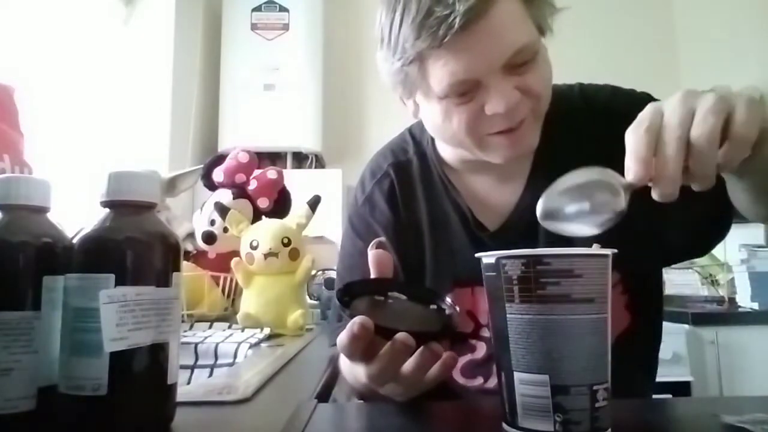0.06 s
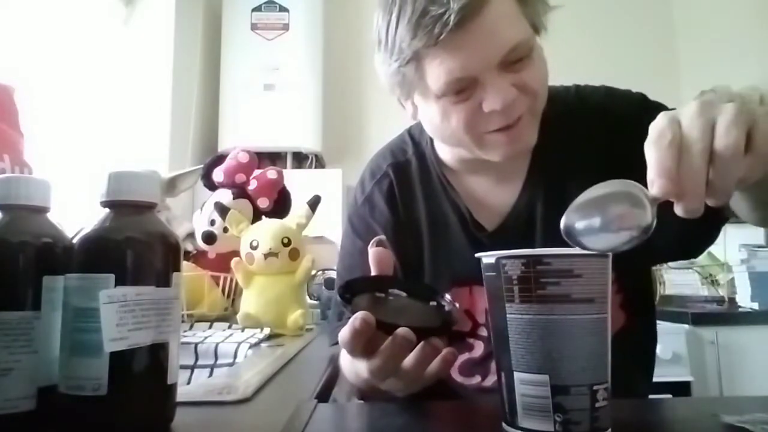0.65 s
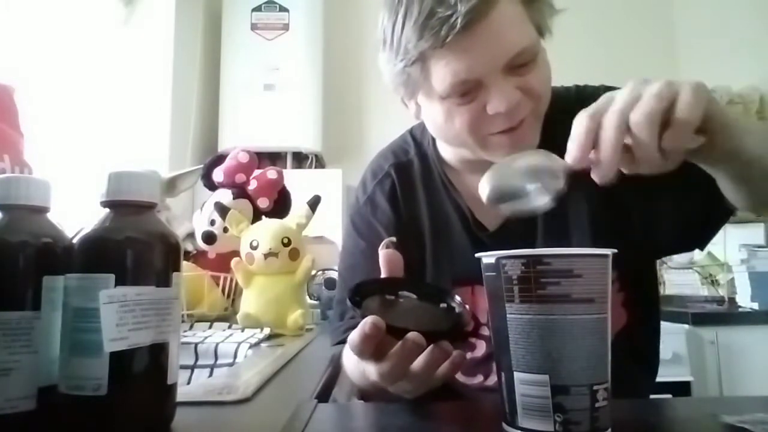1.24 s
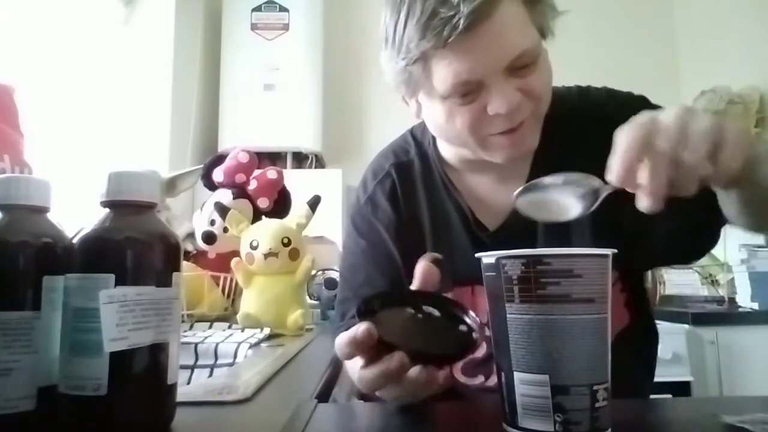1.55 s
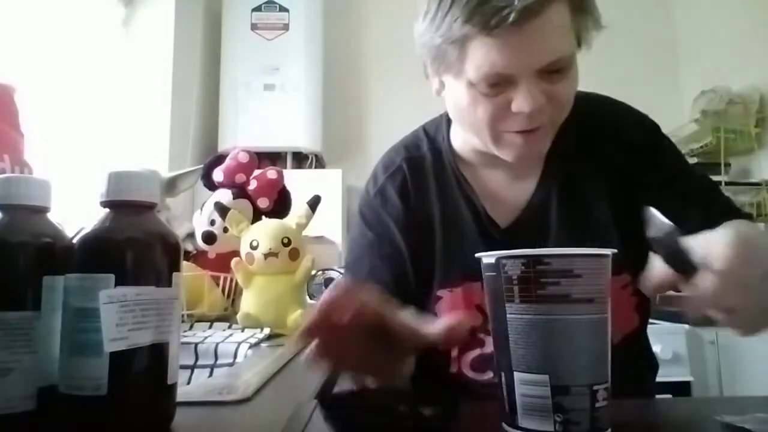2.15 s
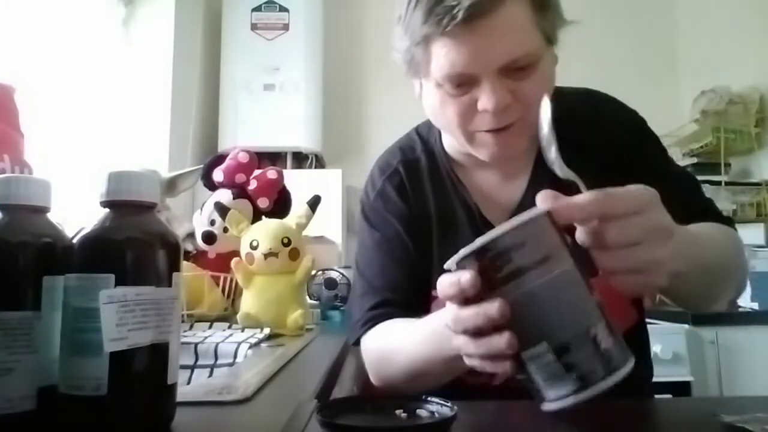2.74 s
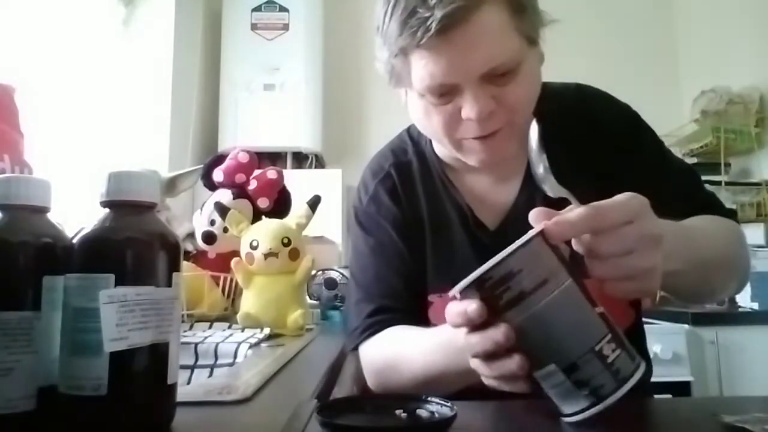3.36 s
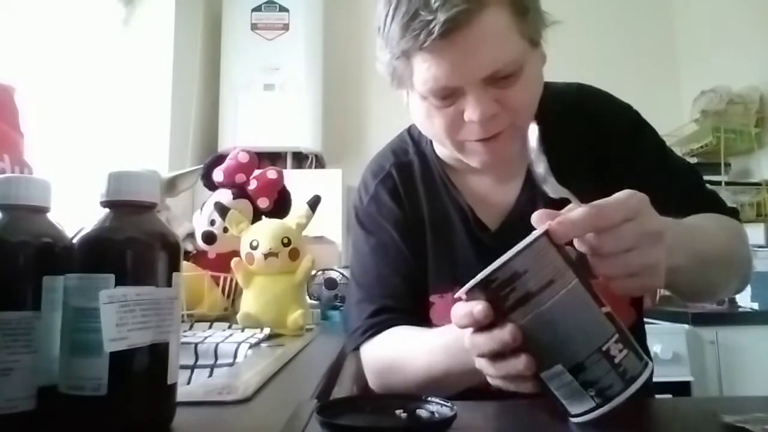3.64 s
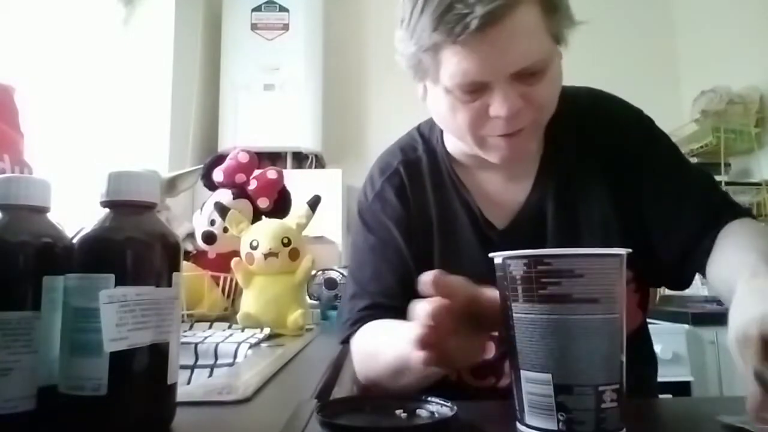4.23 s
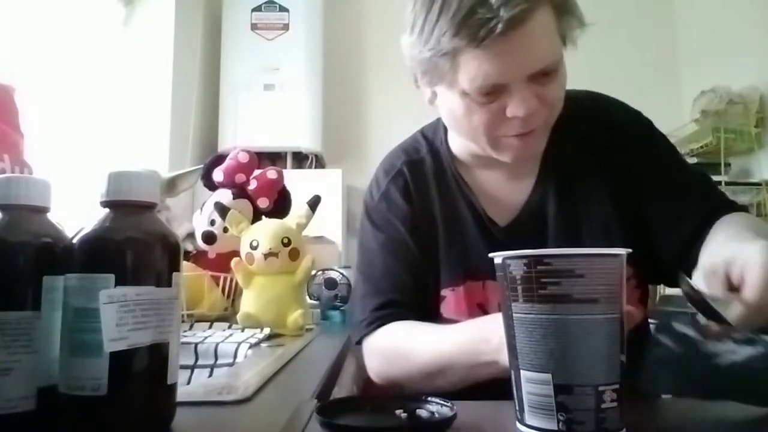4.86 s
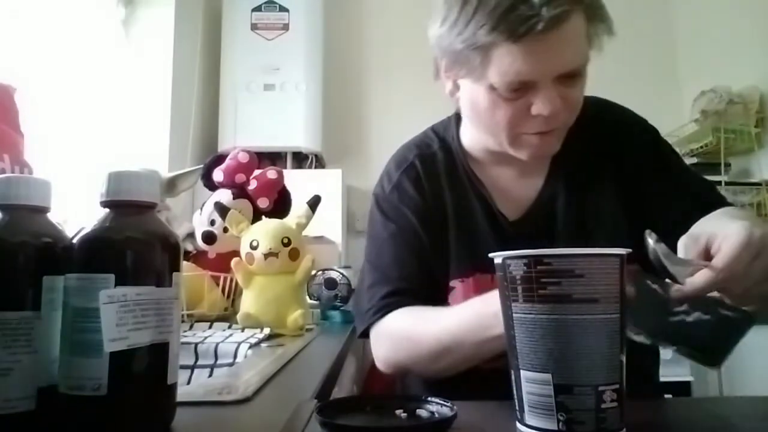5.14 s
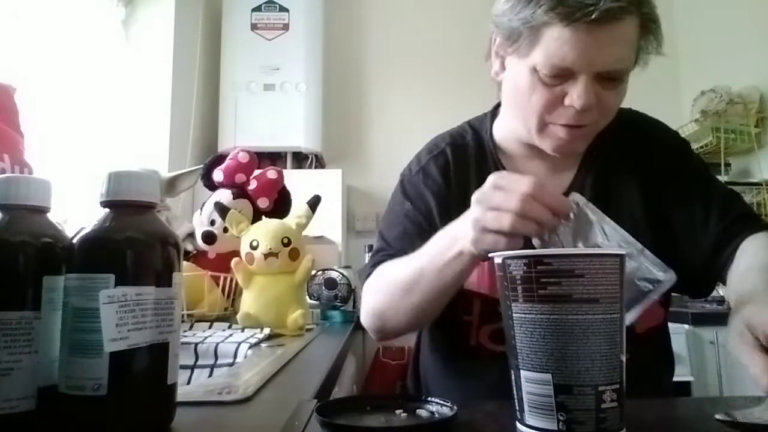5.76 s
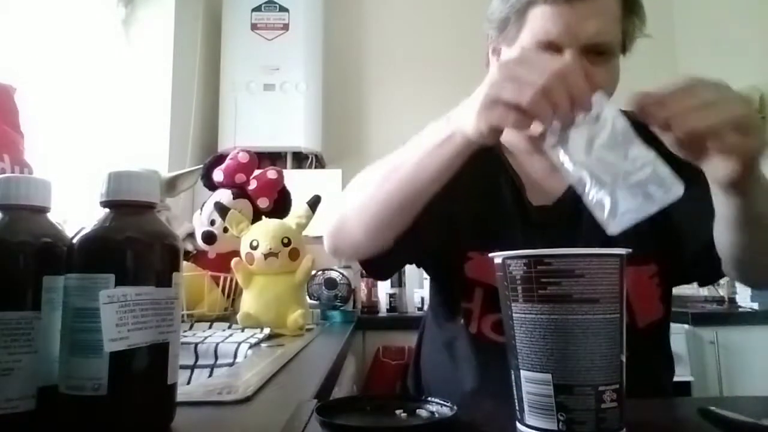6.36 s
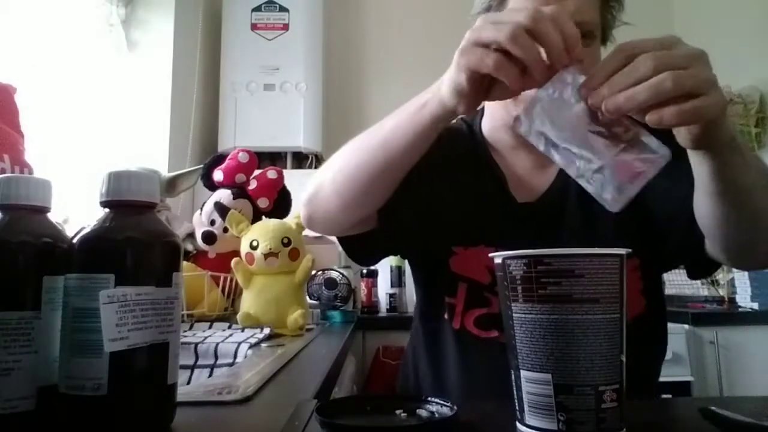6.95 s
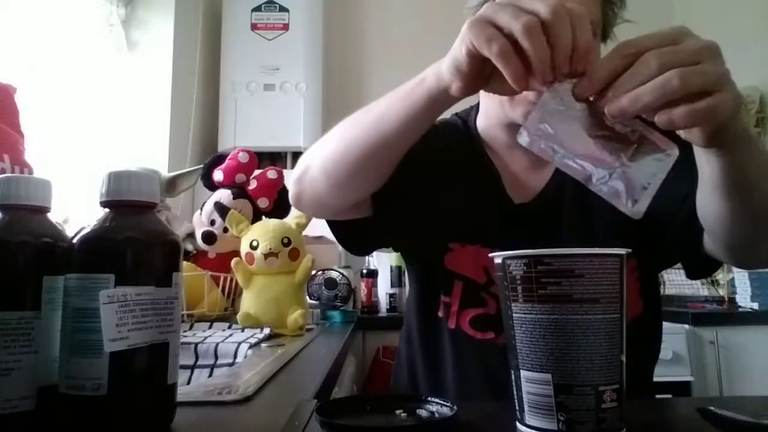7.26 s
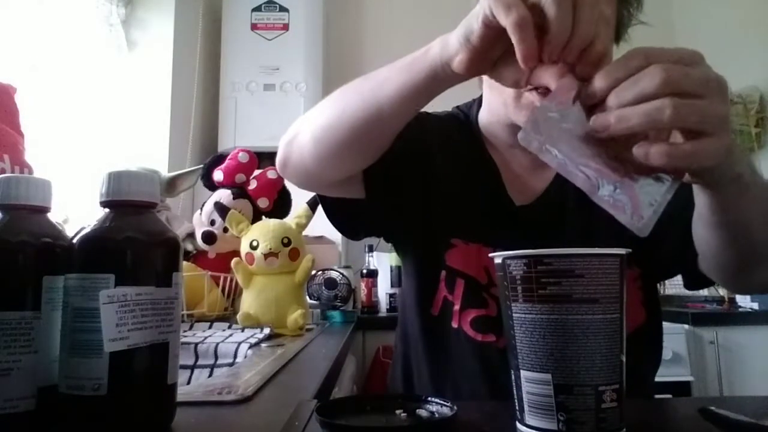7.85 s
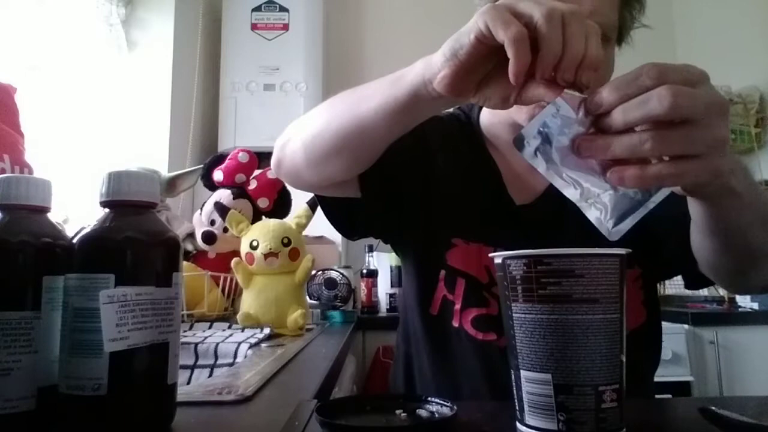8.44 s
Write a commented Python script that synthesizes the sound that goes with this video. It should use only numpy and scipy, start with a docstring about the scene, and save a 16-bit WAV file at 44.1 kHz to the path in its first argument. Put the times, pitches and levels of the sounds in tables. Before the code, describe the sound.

A plastic lid drops, a noodle cup thuds on a desk, and a steel spoon clatters to rest amid faint foil sachet snaps.

```python
"""Instant noodles at a desk

A small kitchen, a small microphone close to the desk. A plastic lid drops with a dry crack, the cup
thuds on the desk three times and the noodles shift. A steel spoon knocks down and rocks to rest,
ringing; a foil sachet is picked up and nicked open. Light ticks and short scrapes go with the handling.
The hardest blows overload the microphone, and a noise suppressor shortens the decays."""
import sys
import numpy as np
from scipy import signal
from scipy.fft import rfft, irfft, next_fast_len
from scipy.io import wavfile
from scipy.ndimage import uniform_filter1d

SR = 44100
rng = np.random.default_rng(int(sys.argv[2]) if len(sys.argv) > 2 else 0)


def inscribe(sig):
    """Save sig as 16-bit PCM at rate SR to the path in sys.argv[1].

    A 1-D sig is mono; a 2-D sig holds one channel per row.
    Samples are clipped to [-1, 1] before scaling.
    """
    pcm = np.round(np.clip(np.atleast_2d(sig).T, -1, 1) * 32767)
    wavfile.write(sys.argv[1], SR, pcm.astype(np.int16))


N = 374850
TIME = np.arange(N) / SR
AGE = TIME[:SR // 2]   # time since a contact [s]

# Levels are relative within each table.
# steady room tone (frequency [Hz], level [dB])
ROOM_TONE = [(15, -62), (25, -31), (92, 0), (190, -12), (242, -9), (277, -18), (326, -10), (416, -19),
             (607, -21), (840, -32), (2760, -39), (4740, -45), (6740, -41), (16000, -49)]
# decay of the kitchen's echoes (frequency [Hz], t60 [s])
KITCHEN_T60 = [(100, .22), (500, .25), (2000, .27), (6000, .31), (14000, .28)]
# rubbing strokes of arms, fingers and cup, lid, sachet (time [s], length [s], level [dB])
ARM_SHIFTS = [(.15, .2, -64), (1.45, .7, -65.5), (2.55, 0.77, -66), (3.3, 0.29, -60.5)]
CUP_SLIDES = [(.62, 0.015, -64.5), (2.475, 0.11, -61), (3.78, .04, -74), (3.825, 0.11, -56)]
LID_SCRAPES = [(1.94, .07, -55), (2.07, .08, -61)]
SACHET_DRAGS = [(4.3, .33, -57.5), (4.84, .05, -59.5)]
# spectra of those four kinds of rubbing (frequency [Hz], level [dB])
ARM_COLOUR = [(30, -18), (85, 0.5), (140, -10.5), (260, -16.5), (500, -24), (1200, -38), (4000, -67)]
SLIDE_COLOUR = [(300, -10), (780, 2), (1100, -15), (1900, -3), (2500, -7), (3300, 2), (4500, -11),
                (6000, -6), (10500, -8), (12500, -16), (15500, -16)]
SCRAPE_COLOUR = [(1100, -21), (1520, 1.5), (2100, -19.5), (2950, -4), (4300, -11.5), (5300, -5),
                 (7200, -4.5), (11000, -8), (15500, -22)]
FOIL_COLOUR = [(900, -24), (1900, -3), (3500, -2), (4400, -6), (7500, 2), (11000, -5), (15500, -14)]
# touches on cup and lid; foil snapping (time [s], level [dB], resonance [Hz], its height [dB])
TOUCHES = [(.595, -45, 1590, 11), (.653, -50.5, 1680, 3), (.717, -51, 2920, 2), (.82, -69, 3260, 1),
           (.908, -53.5, 760, 18), (2.577, -62, 3256, 8), (1.938, -40.5, 1485, 15),
           (3.822, -51.5, 5840, 14), (4.068, -69, 7000, -6), (4.115, -66.5, 9100, 4)]
FOIL_SNAPS = [(4.353, -41, 3200, 15), (4.374, -49, 11000, -3), (4.50, -48, 2950, 6), (4.56, -54, 2360, 10),
              (4.727, -58, 2130, 9), (4.829, -50, 2010, 10), (5.365, -64, 2340, 4), (6.89, -62, 2970, 6),
              (7.665, -52, 2200, 9), (7.666, -49, 6500, 7), (7.841, -39.5, 7500, 0),
              (8.249, -36.5, 4000, 0)]
# the lid landing; dry noodles shifting after each tap (time [s], level [dB])
LID_HITS = [(2.1548, -15), (2.1728, -4), (2.1755, -10.5), (2.188, -22), (2.264, -38)]
NOODLE_SHIFTS = [(2.933, -69.5), (3.212, -56.5), (3.3625, -55)]
# soft blows on the desk, the three loud ones with the cup base (time [s], level [dB], contact [s])
THUDS = [(2.298, -35.5, 0.0049), (2.882, -50, 0.013), (2.931, -22.5, 0.0036), (3.2096, -15, 0.00448),
         (3.36, -12, 0.00474), (8.143, -44, 0.0051)]
# contact spectra of lid, noodles, cup, spoon knocks and spoon clacks (frequency [Hz], level [dB])
LID_COLOUR = [(100, -20.5), (350, -6.5), (1000, -10), (1700, -4), (2700, -1.5), (4200, -4.5), (5800, -1),
              (7400, -3.5), (8300, -10), (10000, -10), (11500, -19.5), (15500, -24)]
NOODLE_COLOUR = [(500, -10), (1400, -3), (2500, 3), (4200, -10), (5600, 0), (7300, 5), (9500, -3),
                 (11200, -1.5), (12500, -13), (15500, -21)]
CUP_COLOUR = [(60, -10), (180, 2.5), (330, -2.5), (450, -13), (720, -8.5), (950, -29), (1400, -20),
              (2400, -29), (4000, -36), (12000, -74)]
KNOCK_COLOUR = [(60, -18.5), (300, -4), (750, -8.5), (1100, -4), (1900, 5), (2400, -11), (3300, -10.5),
                (3900, -37), (4400, -15.5), (5600, -19), (7000, -12.5), (8400, -28), (12000, -31.5),
                (15500, -34.5)]
CLACK_COLOUR = [(60, -21.5), (280, -11), (420, -4), (850, -14), (1600, -3.5), (2400, -10), (3300, -12),
                (3900, -21), (4400, -9.5), (5300, -15.5), (6200, -7.5), (7600, -15), (9500, -22.5),
                (10700, -28.5), (15500, -49)]
# modes of the desk top and the steel spoon (frequency [Hz], level [dB], t60 [s])
DESK_MODES = [(81, -8.5, .27), (188, -6.5, .14), (218, -11, .14), (348, -4, .11), (408, -3, .11),
              (490, -8, .1), (673, -12, .1), (877, -9, .07), (1060, 0, .14), (1342, -6, .12),
              (1465, -3, .08), (1518, 1, .12), (1780, -3, .08), (1904, 0, .08), (2014, 0, .1),
              (2630, -11, .07)]
SPOON_MODES = [(3144, -4, .13), (3503, -2.5, .17), (4261, -7, .12), (4296, 0, .14), (4425, -10, .12),
               (4996, -7, .3), (6105, -6, .14), (7800, 0, .16), (9069, -12, .18), (9588, -9, .16),
               (11893, -14, .15), (12161, -11, .15), (12954, -20, .12), (13286, -22, .13),
               (15300, -25, .09)]
# contacts that make the steel sing out (time [s], level [dB], favoured frequency [Hz])
CHIMES = [(5.7625, -21, 14000), (5.785, -32, 9600), (6.0273, -25, 3900), (6.028, -22, 7800),
          (6.0445, -18, 9000), (6.0625, -23, 7800), (6.0935, -24, 6100), (6.1075, -20, 4300),
          (6.127, -18.5, 4300), (6.147, -19, 7800), (6.158, -25, 12000), (6.168, -21, 7800),
          (6.207, -23.5, 3000)]


def from_db(db):
    """Decibels to gain."""
    return 10 ** (np.asarray(db) / 20)


def rms_one(x):
    """Scale to an rms of 1."""
    return x / np.sqrt(np.mean(x ** 2) + 1e-20)


def at_hz(points, hz):
    """Read a table on a log-frequency axis."""
    known_hz, values = np.transpose(points)
    return np.interp(np.log(np.maximum(hz, 1)), np.log(known_hz), values)


def fade(t60):
    """Free decay, down 60 dB after t60 seconds."""
    return np.exp(-np.log(1000) * AGE / t60)


def add(track, s, sound):
    """Mix a sound into a track at s seconds."""
    start = round(s * SR)
    track[start:start + len(sound)] += sound[:N - start]


def coloured(x, spectrum):
    """Causal (minimum-phase) filter of a given spectrum that keeps the power of white noise."""
    size = next_fast_len(len(x) // 2 + 2048) * 2
    gain = rms_one(from_db(at_hz(spectrum, np.fft.rfftfreq(size, 1 / SR))))
    cepstrum = irfft(np.log(gain))
    cepstrum[1:size // 2] *= 2
    cepstrum[size // 2 + 1:] = 0
    return irfft(rfft(x, size) * np.exp(rfft(cepstrum)))[:len(x)]


def room_tone():
    """The faint, low, steady noise of the kitchen."""
    return from_db(-66.5) * rms_one(coloured(rng.standard_normal(N), ROOM_TONE))


def kitchen_echoes(x, build_s):
    """Diffuse echoes off near walls: they build up within milliseconds and die soonest in the bass."""
    white = rfft(rng.standard_normal(len(AGE)))
    hz = np.fft.rfftfreq(len(AGE), 1 / SR)
    tail = 0
    for centre_hz, t60 in KITCHEN_T60:
        share = at_hz([(f, f == centre_hz) for f, _ in KITCHEN_T60], hz)
        tail += irfft(white * share, len(AGE)) * fade(t60)
    tail *= 1 - np.exp(-(AGE / build_s) ** 2)
    return signal.fftconvolve(x, tail / np.linalg.norm(tail))[:N]


def rubbing(strokes, spectrum, attack_s, release_db_per_s, grain_db=2.5):
    """Friction noise that jumps with every tiny slip; each stroke gathers speed, holds and dies away."""
    gain = np.zeros(N)
    for s, length_s, db in strokes:
        rise = np.clip((TIME - s) / attack_s, 0, 1)
        gain += rise * from_db(db - release_db_per_s * np.maximum(TIME - s - length_s, 0))
    slips = rms_one(uniform_filter1d(rng.standard_normal(N), size=130))
    grainy = rng.standard_normal(N) * from_db(grain_db * slips)
    return gain * rms_one(coloured(grainy, spectrum))


def crack(t60):
    """The many crowded, quickly damped modes of one contact."""
    return rng.standard_normal(len(AGE)) * fade(t60)


def cracks(hits, spectrum, t60):
    """A series of contacts on one object."""
    out = np.zeros(N)
    for s, db, *_ in hits:
        add(out, s, from_db(db) * crack(t60))
    return coloured(out, spectrum)


def ticks(hits, t60, below_db, above_db, top_db, edge_hz):
    """Small contacts, each one resonance on broad flanks; a yielding one has little extreme treble."""
    out = np.zeros(N)
    for s, db, hz, height_db in hits:
        hump = [(hz / 4, below_db), (hz / 1.25, 0), (hz, height_db),
                (hz * 1.25, 0), (hz * 4, above_db), (hz * 16, top_db)]
        add(out, s, from_db(db) * coloured(crack(t60), hump))
    return signal.sosfilt(signal.butter(3, edge_hz, fs=SR, output="sos"), out)


def desk_ring():
    """The desk top's decaying modes, their strengths a little different on every blow."""
    return sum(from_db(db + rng.normal(0, 1.5)) * np.sin(2 * np.pi * hz * AGE) * fade(t60)
               for hz, db, t60 in DESK_MODES)


def desk_blows(hits, gain_db):
    """Hard blows set the whole desk top ringing."""
    out = np.zeros(N)
    for s, db in hits:
        add(out, s, from_db(db + gain_db) * desk_ring())
    return out


def lid_drop():
    """The plastic lid lands in a few quickly damped cracks."""
    return cracks(LID_HITS, LID_COLOUR, t60=.024)


def cup_taps():
    """Soft pushes stir only the low desk modes; the cup adds a hollow puff and the noodles shift."""
    thuds = np.zeros(N)
    for s, db, contact_s in THUDS:
        push = np.sin(np.pi * np.minimum(AGE / contact_s, 1))
        add(thuds, s, from_db(db + 1) * signal.fftconvolve(desk_ring(), push / push.sum()))
    puffs = from_db(-14) * cracks(THUDS, CUP_COLOUR, t60=.073)
    return thuds + puffs + cracks(NOODLE_SHIFTS, NOODLE_COLOUR, t60=.36)


def bounce_times(start_s, gap_s, shrink, count, shortest_s=.0095):
    """Moments of contact of a bouncing object: every flight is a share of the one before."""
    gaps = np.maximum(gap_s * shrink ** np.arange(count - 1), shortest_s)
    return start_s + np.append(0, np.cumsum(gaps))


def spoon_knocks():
    """Dull, hard knocks as the spoon lands on the desk, each bounce weaker than the last."""
    times = bounce_times(start_s=5.7622, gap_s=.0228, shrink=.66, count=8)
    bounces = [(s, -2 - 4 * i) for i, s in enumerate(times)]
    return cracks(bounces, KNOCK_COLOUR, t60=.03) + desk_blows(bounces, gain_db=-16)


def spoon_rocking(start_s, hold_s, fade_db_per_s):
    """The spoon tips and rocks to rest in quickening, uneven clacks (time [s], level [dB])."""
    times = bounce_times(start_s, gap_s=.0172, shrink=.957, count=17)
    times[2:] += rng.normal(0, .001, len(times) - 2)
    db = rng.normal(-16, 1, len(times)) - fade_db_per_s * np.maximum(times - start_s - hold_s, 0)
    db[1] += 7.5   # the other end comes down hardest
    return np.column_stack([times, db])


def spoon_rattle(clacks):
    """Each clack of the rocking spoon is a bright crack that also rings the desk."""
    return from_db(-2) * cracks(clacks, CLACK_COLOUR, t60=.065) + desk_blows(clacks, gain_db=-15.5)


def spoon_ring(clacks, rest_s, damping_db_per_s, others_db=-13, focus_octaves=.2):
    """Every clack feeds all the steel's modes, a chime mostly those that move where it lands."""
    out = np.zeros(N)
    for hz, db, t60 in SPOON_MODES:
        energy = np.zeros(N)
        for s, clack_db in clacks:
            add(energy, s, (from_db(clack_db + db - 16.5) * fade(t60)) ** 2)
        for s, chime_db, favoured_hz in CHIMES:
            away = 1 - np.exp(-(np.log2(hz / favoured_hz) / focus_octaves) ** 2)
            add(energy, s, (from_db(chime_db + db + others_db * away) * fade(t60)) ** 2)
        # clacks also jog the phase, which widens the spectral lines
        jogs = np.zeros(N)
        jogs[(clacks[:, 0] * SR).astype(int)] = rng.normal(0, .6, len(clacks))
        out += np.sqrt(energy) * np.sin(2 * np.pi * hz * TIME + np.cumsum(jogs))
    # once the spoon lies flat, the desk damps its ring
    return out * from_db(-damping_db_per_s * np.maximum(TIME - rest_s, 0))


def scene():
    """Lid, cup, spoon and sachet close to the microphone, the kitchen behind them; mono."""
    clacks = spoon_rocking(start_s=6.0273, hold_s=.11, fade_db_per_s=253.5)
    lid = lid_drop()
    knocks = spoon_knocks()
    rattle = spoon_rattle(clacks)
    ring = from_db(3) * spoon_ring(clacks, rest_s=6.225, damping_db_per_s=170)
    cup = cup_taps()
    touches = ticks(TOUCHES, t60=.055, below_db=-2, above_db=-12, top_db=-30, edge_hz=9000)
    foil = ticks(FOIL_SNAPS, t60=.032, below_db=-31, above_db=-17, top_db=-55, edge_hz=.45 * SR)
    slides = rubbing(CUP_SLIDES, SLIDE_COLOUR, attack_s=.0083, release_db_per_s=146)
    drags = rubbing(SACHET_DRAGS, FOIL_COLOUR, attack_s=.008, release_db_per_s=240)
    scrapes = rubbing(LID_SCRAPES, SCRAPE_COLOUR, attack_s=.0097, release_db_per_s=149.5)
    arms = rubbing(ARM_SHIFTS, ARM_COLOUR, attack_s=.13, release_db_per_s=49.5, grain_db=-.5)
    background = room_tone() + arms + scrapes + drags + slides
    # (direct sound, level sent into the room [dB])
    sends = [(touches, -6.5), (foil, -7.5), (lid, -10), (cup, -11.5),
             (knocks, -19.5), (rattle, -10), (ring, -21.5)]
    direct = sum(sound for sound, _ in sends)
    echoes = kitchen_echoes(sum(from_db(db) * sound for sound, db in sends), build_s=.02)
    # small objects radiate little deep bass
    low_cut = signal.butter(4, 70, "high", fs=SR, output="sos")
    return (background + signal.sosfilt(low_cut, direct + echoes))[None]


def suppress_tails(x, release_db_per_s, knee_db, span_db, depth_db, treble_hz):
    """Noise suppressor: a band far below its recent peak is turned down, so decays end early."""
    hz, s, bins = signal.stft(x, SR, nperseg=512, noverlap=384)
    power = uniform_filter1d(np.abs(bins) ** 2, size=9, axis=-2)
    power = uniform_filter1d(power, size=5, axis=-1)
    level_db = 10 * np.log10(np.maximum(power, 1e-14))
    peak_db = np.maximum.accumulate(level_db + release_db_per_s * s, axis=-1) - release_db_per_s * s
    closed = np.clip((peak_db - level_db - knee_db) / span_db, 0, 1)
    cut_db = depth_db * closed * np.where(hz < treble_hz, 1, .5)[:, None]   # half as hard in the treble
    return signal.istft(bins * from_db(cut_db), SR, nperseg=512, noverlap=384)[1][..., :N]


def record(dry):
    """The hardest blows overload the close microphone; decays are shortened, the top cut at 16 kHz."""
    ceiling = .99
    overloaded = ceiling * np.tanh(dry / ceiling)
    sound = suppress_tails(overloaded, release_db_per_s=101.5, knee_db=10, span_db=14.5,
                           depth_db=-9, treble_hz=5000)
    low_pass = signal.ellip(10, .1, 80, 16000, fs=SR, output="sos")
    return signal.sosfilt(low_pass, sound)


dry = scene()
out = record(dry)
inscribe(out)
```